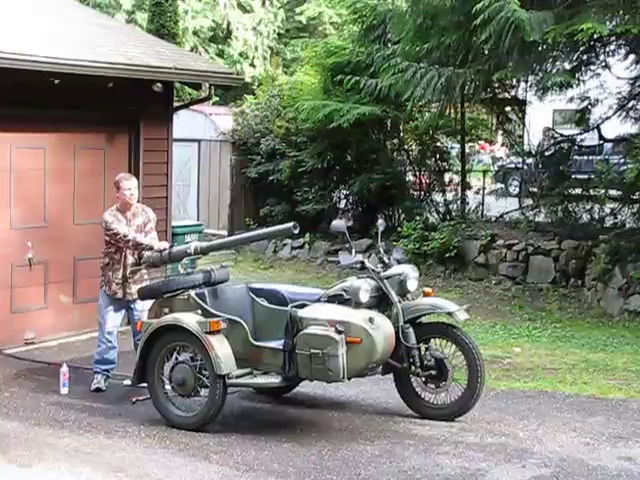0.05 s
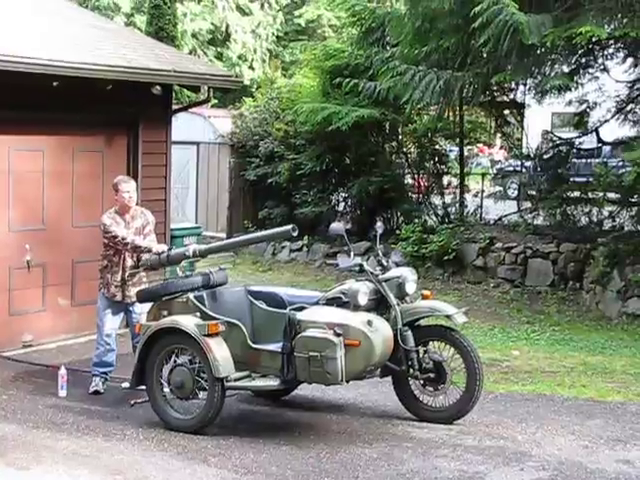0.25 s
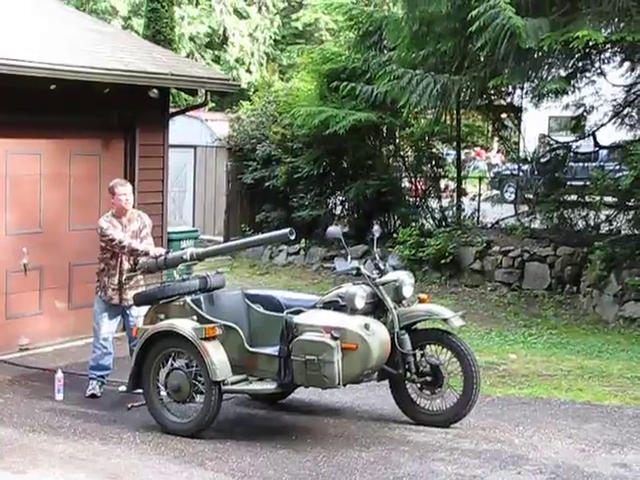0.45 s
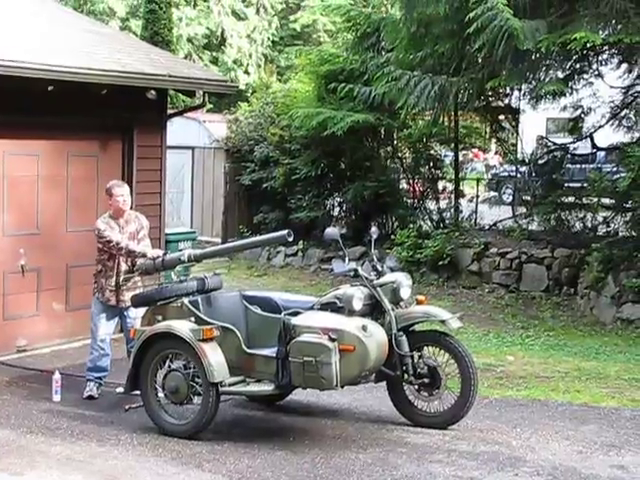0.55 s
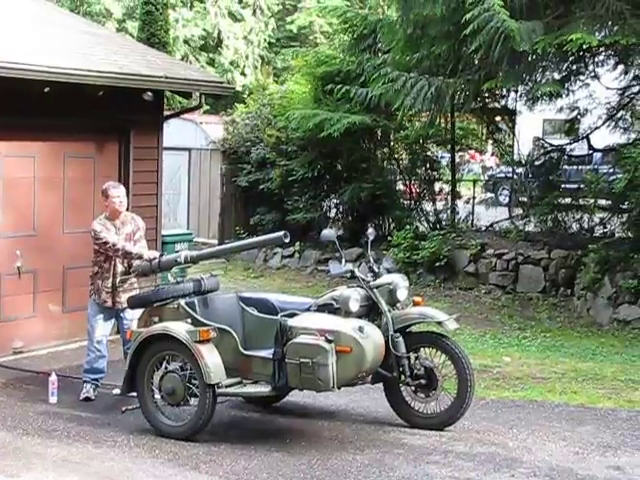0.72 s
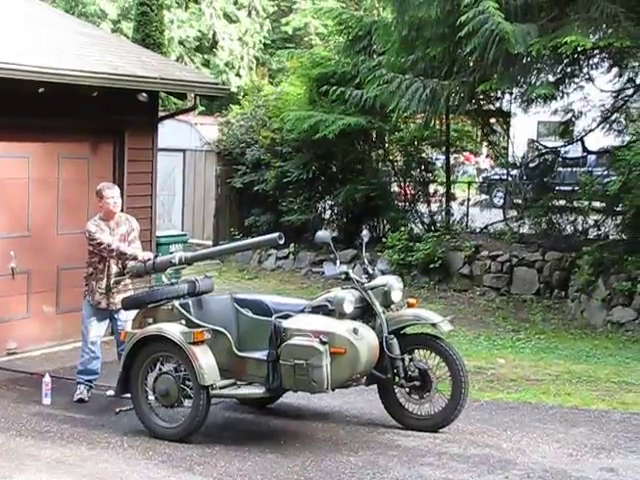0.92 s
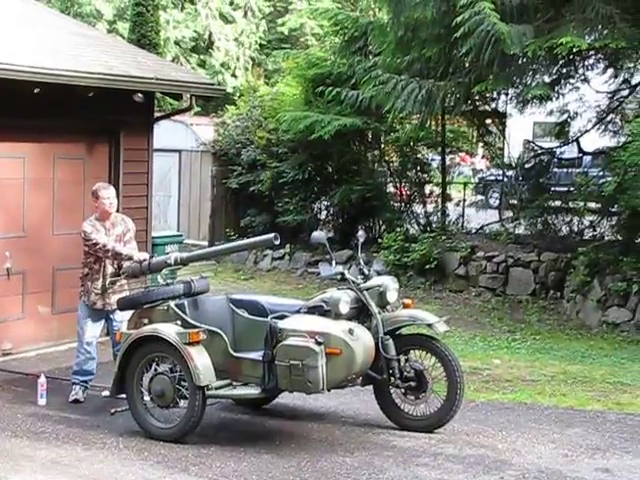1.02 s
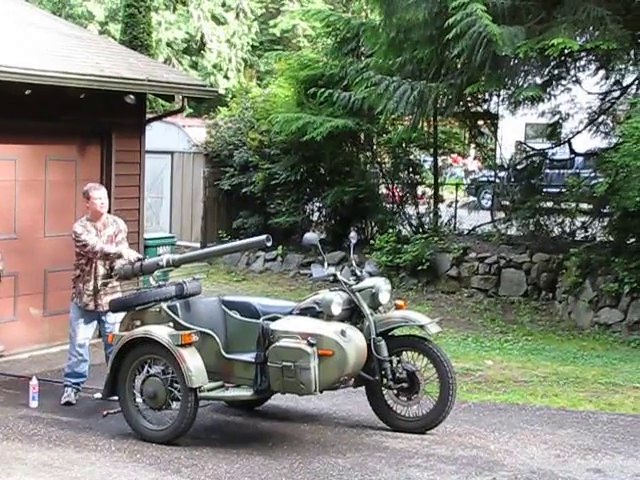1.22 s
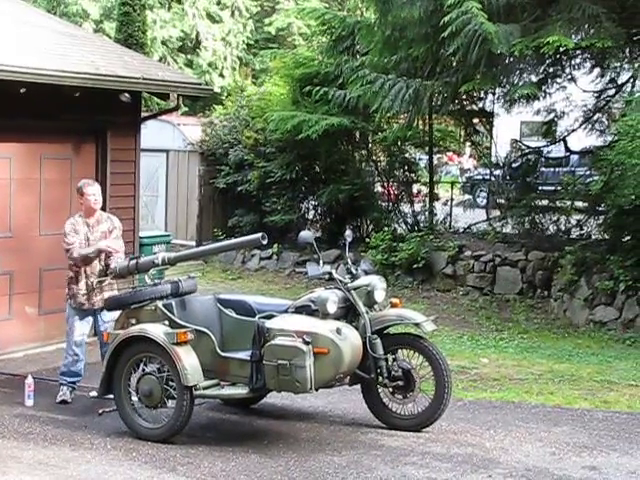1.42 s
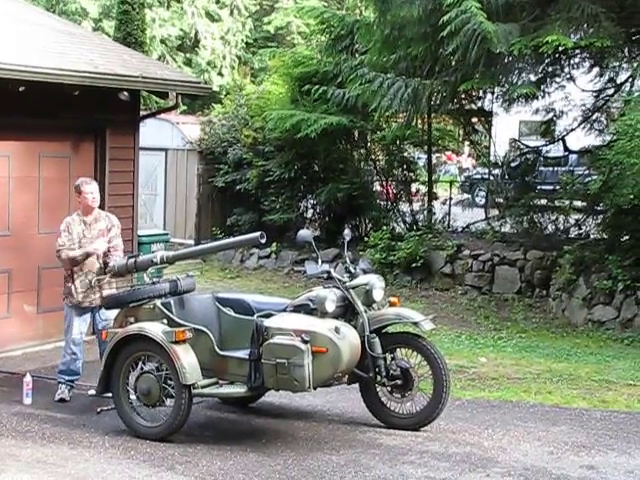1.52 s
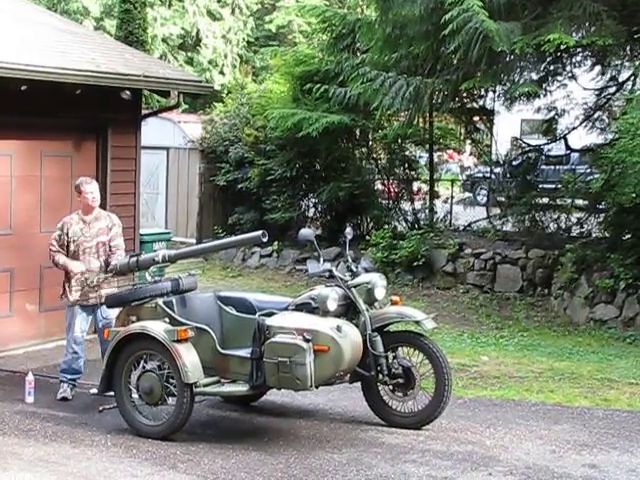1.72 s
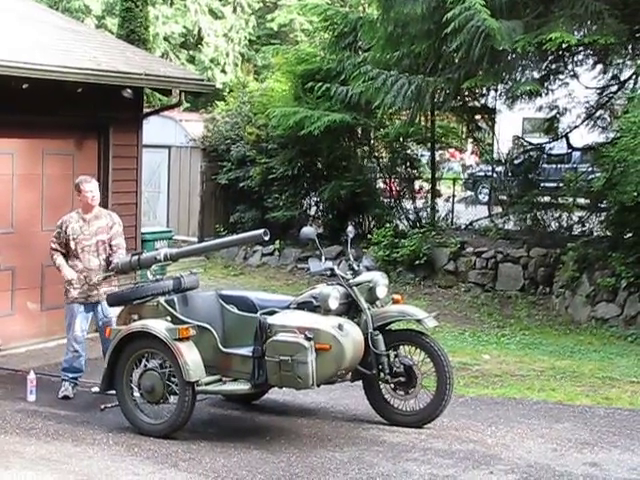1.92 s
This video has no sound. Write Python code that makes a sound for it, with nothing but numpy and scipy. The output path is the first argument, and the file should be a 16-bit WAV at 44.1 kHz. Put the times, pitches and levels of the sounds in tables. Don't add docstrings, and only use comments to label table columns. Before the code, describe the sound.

Single loud cannon blast outdoors after tiny clicks, rolling off walls, trees and distant slopes

```python
import sys
import numpy as np
from scipy import signal
from scipy.io import wavfile
from scipy.ndimage import uniform_filter1d

SR = 44100
rng = np.random.default_rng(int(sys.argv[2]) if len(sys.argv) > 2 else 0)


def master_out(mix):
    frames = np.transpose(np.atleast_2d(mix))
    ceiling = np.clip(frames, -1, 1)
    pcm = np.round(ceiling * 32767).astype(np.int16)
    wavfile.write(sys.argv[1], SR, pcm)


def invert_db(x):
    u = np.asarray(x, float) / 20
    return 10 ** u


N = 85995

# (frequency [Hz], level per hertz [dB])
SUBURB_SPECTRUM = [(30, -4.5), (60, -5.5), (140, -8.5), (300, -15), (700, -18.5), (2800, -25), (6000, -37),
                   (16000, -48.5)]
# (frequency [Hz], wobble [Hz], level [dB])
MACHINE_HUMS = [(122, 5, -47), (263, 4, -53)]
# (time [s], level [dB], centre [Hz], width [Hz], ring
# t60 [s])
HANDLING_CLICKS = [(.0631, -35, 7600, 3000, .02), (.0635, -38, 4600, 1500, .02),
                   (.1396, -33, 7500, 4000, .03), (1.865, -47, 5200, 600, .03), (0, -46, 2800, 400, .2),
                   (.0135, -38, 1500, 600, .015), (.0743, -40, 7200, 3500, .025),
                   (.075, -43, 4600, 1500, .02), (.085, -56, 8000, 7000, .04), (.141, -42, 7000, 5000, .18),
                   (.140, -48, 13000, 5000, .12), (1.285, -57, 9000, 9000, 1.2),
                   (1.34, -56, 8000, 11000, .2), (1.53, -52, 6500, 7000, .1), (0, -56, 7000, 7000, 1.5)]
# (centre [Hz], width [Hz], level [dB])
CLOTH_BANDS = [(2170, 2250, -51), (5100, 790, -61), (8600, 3800, -68), (800, 770, -47.5)]
# (frequency [Hz], half-octave level at the shot [dB], t60 [s])
SLOPE_ECHOES = [(27.4, -38, 6.4), (63.5, -15.5, 3.53), (155, -41, 0.76), (323.5, -18, 3.51),
                (741, -10.5, 3.19), (2540, -7.5, 2.227), (6060, -15.5, 1.37), (14900, -30, 0.49)]
# (frequency [Hz], half-octave level at the shot [dB], t60 [s])
YARD_ECHOES = [(40, -16, 0.99), (130, -14, 0.56), (400, -6, 0.7), (1200, -5.5, 0.4), (2500, 1, 0.42),
               (5960, -12.5, 0.74), (14500, -19.5, 0.7)]
# (delay after the shot [s], frequency [Hz], level [dB], t60 [s], sign [+1 or -1])
MUZZLE_RINGS = [
    (.0008, 565, 14, .045, -1),
    (-.0001, 450, 8, .006, -1),
    (.0232, 61, 5, .17, 1),
    (0, 35, 4, .06, -1),
    (.11, 80, -10, .12, 1),
    (.162, 80, -11, .15, 1),
    (.27, 58, -18, 1.6, 1),
]
HALF_OCTAVES_HZ = 35 * 2 ** np.arange(0, 9.1, .5)

SHOT_S = .2136
PORTS_HZ, SIDE_LOW_DB = 3000, -22
SUBURB_DB = -44.5
CLICK_RISE_S = .0007
RUSTLE_S, RUSTLE_LEN_S = 1.8, .08
CLUMP_DB, CLUMP_RATE_HZ = 2, 45
YARD_RISE_S, YARD_END_S, YARD_END_DB = .009, .083, -6
HOUSES_S, HOUSES_LEN_S, HOUSES_DB = 0.22, 0.062, 3.5
FLAME_DB, FLAME_HZ, FLAME_RISE_DB_S = -13, 1100, 1400
WHUMP_DB, WHUMP_HZ, WHUMP_RISE_DB_S = -26, 70, 400
CRACK_DB, CRACK_HZ, CRACK_T60_S = -3, 3000, .05
OVERLOAD_DB = 1
FAST_DB, FAST_S, FAST_DELAY_S = -5, .002, .0066
SLOW_DB, SLOW_S = -16, .09
HOLD_S, RECOVER_DB_S = 0.65, 15.5
LOW_CUT_HZ, TOP_HZ = 22, 16100


def level(x, db):
    return x * invert_db(db) / np.sqrt(np.mean(x ** 2))


def band(hz, width, channels=1):
    edges = [max(hz - width / 2, 9), min(hz + width / 2, .49 * SR)]
    sos = signal.butter(2, edges, "band", fs=SR, output="sos")
    return level(signal.sosfilt(sos, rng.standard_normal((channels, N))), 0)


def wide(hz, width):
    mid, side = band(hz, width, channels=2)
    ratio = hz / PORTS_HZ
    share = np.hypot(invert_db(SIDE_LOW_DB), ratio / np.hypot(1, ratio))
    return mid + share * side * np.array([[1], [-1]])


def walk(rate):
    k = int(SR / rate)
    steps = np.repeat(rng.standard_normal(N // k + 1), k)
    return 1.47 * uniform_filter1d(uniform_filter1d(steps, k), k)[:N]


def read(table, hz, axis):
    columns = np.array(table)
    return np.interp(np.log(hz), np.log(columns[:, 0]), columns[:, axis])


def fade(age, t60):
    return (age >= 0) * invert_db(-60 * np.maximum(age, 0) / t60)


def suburb():
    bed, hum = 0, 0
    for hz in HALF_OCTAVES_HZ:
        flicker = invert_db(read(SUBURB_SPECTRUM, hz, axis=1) + 1.9 * walk(5.4))
        bed = bed + wide(hz, hz / 3) * np.sqrt(hz) * flicker
    for hz, wobble, db in MACHINE_HUMS:
        phase = 2 * np.pi * np.cumsum(hz + wobble * walk(30.17)) / SR
        hum = hum + np.sin(phase) * invert_db(db + 3 * walk(58))
    return level(bed, SUBURB_DB) + hum


def handling(t):
    clicks, cloth = 0, 0
    for s, db, hz, width, t60 in HANDLING_CLICKS:
        rise = np.clip((t - s) / CLICK_RISE_S, 0, 1)
        clicks = clicks + wide(hz, width) * invert_db(db) * fade(t - s, t60) * rise
    for hz, width, db in CLOTH_BANDS:
        cloth = cloth + wide(hz, width) * invert_db(db + 2.3 * walk(40.03))
    return clicks + cloth * np.exp(-((t - RUSTLE_S) / RUSTLE_LEN_S) ** 2)


def echoes(age):
    out, clumps = 0, walk(CLUMP_RATE_HZ)
    thinning = 1 / (1 + np.exp(np.clip((YARD_END_S - age) / .006, -50, 50)))
    houses = np.exp(-((age - HOUSES_S) / HOUSES_LEN_S) ** 2)
    rise = np.clip(age / YARD_RISE_S, 0, 1) ** 2
    rise = rise * invert_db(YARD_END_DB * thinning + HOUSES_DB * houses)
    for hz in HALF_OCTAVES_HZ:
        near = invert_db(read(YARD_ECHOES, hz, axis=1)) * fade(age, read(YARD_ECHOES, hz, axis=2))
        near = near * invert_db(CLUMP_DB * clumps)
        far = invert_db(read(SLOPE_ECHOES, hz, axis=1)) * fade(age, read(SLOPE_ECHOES, hz, axis=2))
        far = far * invert_db(CLUMP_DB / 3 * clumps)
        out = out + wide(hz, hz / 2.33) * np.hypot(near, far) * rise * invert_db(.5 * walk(14))
    return out


def barrel(age):
    before = np.minimum(age, 0)
    flame = band(FLAME_HZ, 960) * invert_db(FLAME_DB + FLAME_RISE_DB_S * before)
    whump = band(WHUMP_HZ, 120) * invert_db(WHUMP_DB + WHUMP_RISE_DB_S * before)
    burn = (flame + whump) * np.where(age < 0, 1, fade(age, .03))
    pop = 0
    for lag, hz, db, t60, sign in MUZZLE_RINGS:
        pop = pop + sign * invert_db(db) * fade(age - lag, t60) * np.sin(2 * np.pi * hz * (age - lag))
    crack = wide(CRACK_HZ, 4200) * invert_db(CRACK_DB) * fade(age, CRACK_T60_S)
    return burn + pop + crack


def scene():
    t = np.arange(N) / SR
    return suburb() + handling(t) + echoes(t - SHOT_S) + barrel(t - SHOT_S)


def low_pass(x):
    return signal.sosfilt(signal.butter(12, 16140, fs=SR, output="sos"), x)


def record(dry):
    age = np.maximum(np.arange(N) / SR - SHOT_S, 0)
    flat = dry / (1 + (dry / invert_db(OVERLOAD_DB)) ** 10) ** (1 / 10)
    fast = (age > 0) / (1 + np.exp(np.clip((FAST_DELAY_S - age) / FAST_S * 4, -50, 50)))
    slow = 1 - np.exp(-age / SLOW_S)
    recovery_db = RECOVER_DB_S * np.maximum(age - HOLD_S, 0)
    gain = invert_db(np.minimum(FAST_DB * fast + SLOW_DB * slow + recovery_db, 0))
    low_cut = signal.butter(1, LOW_CUT_HZ, "high", fs=SR, output="sos")
    top_cut = signal.ellip(8, .2, 60, TOP_HZ, fs=SR, output="sos")
    x = signal.sosfilt(low_cut, flat * gain)
    x = signal.sosfilt(top_cut, np.clip(x, -1, 1))
    return low_pass(np.clip(x, -1, 1))


dry = scene()
out = record(dry)
master_out(out)
```